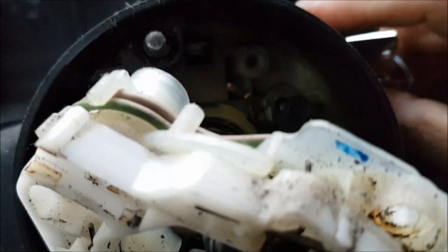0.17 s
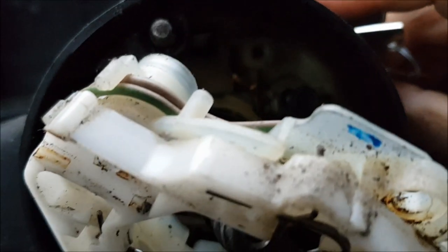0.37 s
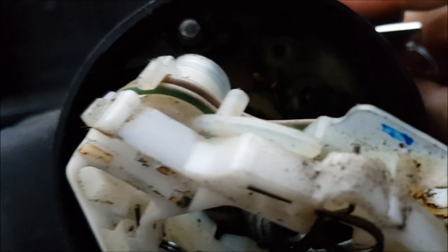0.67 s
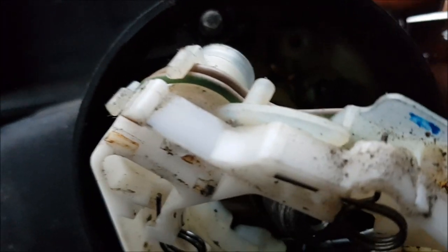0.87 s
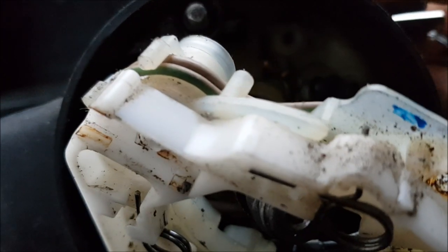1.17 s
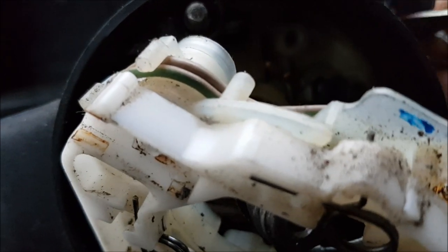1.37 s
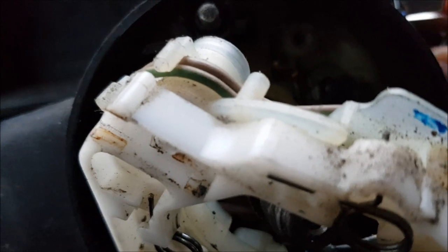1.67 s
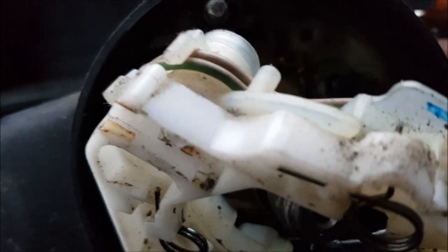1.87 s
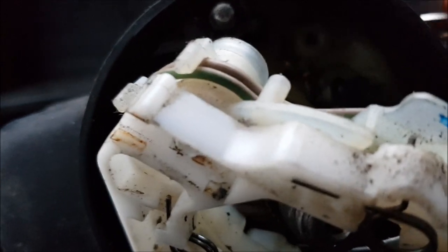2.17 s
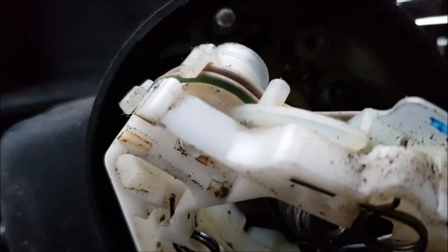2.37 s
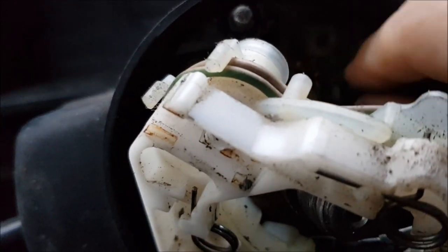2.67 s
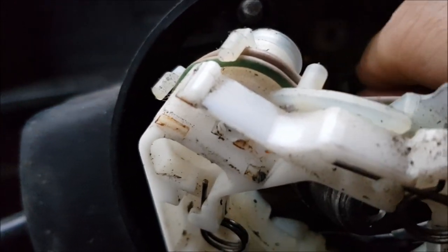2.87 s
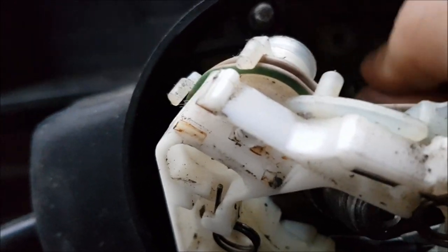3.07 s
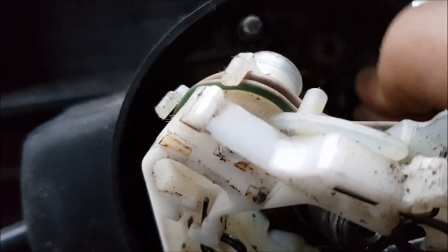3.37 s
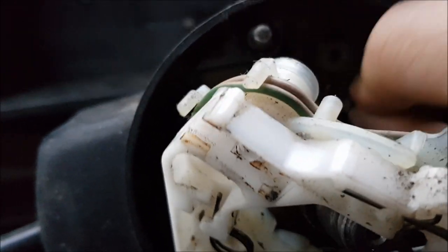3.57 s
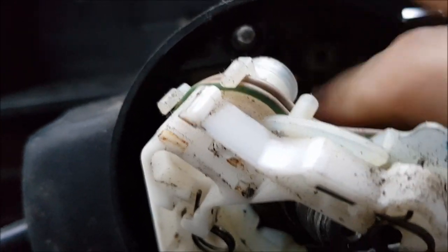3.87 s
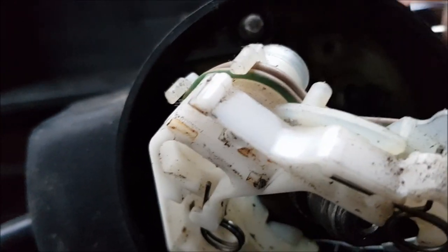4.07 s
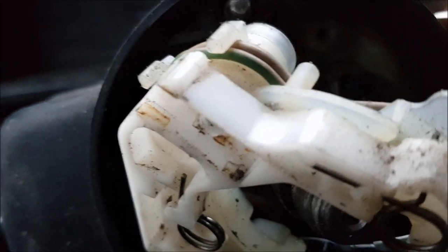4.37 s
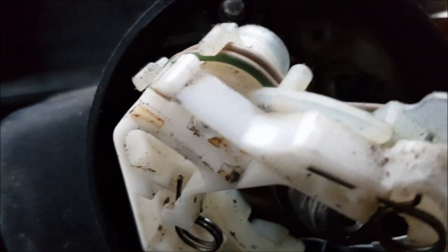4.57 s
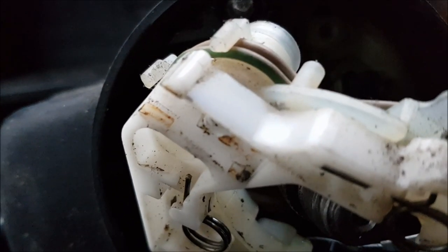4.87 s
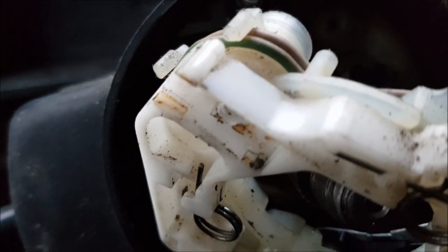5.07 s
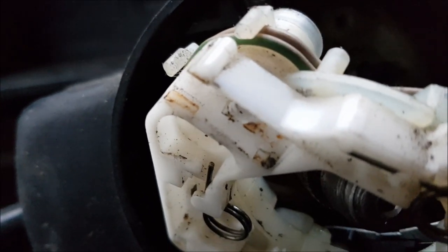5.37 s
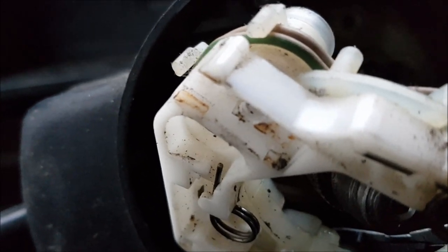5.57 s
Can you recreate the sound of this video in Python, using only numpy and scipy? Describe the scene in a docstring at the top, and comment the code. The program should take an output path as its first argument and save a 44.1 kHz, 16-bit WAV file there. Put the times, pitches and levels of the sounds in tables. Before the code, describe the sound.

Inside a parked car, a lock cylinder clicks and scrapes in the steering column while keys jingle briefly over hand rubbing and low rumble.

```python
"""Low outside rumble and a hand and sleeve rubbing on trim, close to a stereo phone in a parked car.
A lock cylinder with its keys is wiggled into the steering column: bursts of tiny contacts click in
the metal and plastic, the column shudders and thumps in its low modes, and plastic scuffs.
The cylinder slides once in its bore, the keys ring and jangle briefly, and a low hum lies underneath."""
import sys
import numpy as np
from scipy import signal
from scipy.fft import rfft, irfft, next_fast_len
from scipy.io import wavfile
from scipy.ndimage import uniform_filter1d

SR = 44100
rng = np.random.default_rng(int(sys.argv[2]) if len(sys.argv) > 2 else 0)


def log_audio(samples):
    """Write samples as a 16-bit WAV file to the path given in sys.argv[1]."""
    # one column per channel
    frames = np.atleast_2d(samples).T
    # limit to full scale, then quantise
    limited = np.clip(frames, -1, 1)
    pcm = np.round(limited * 32767).astype(np.int16)
    wavfile.write(sys.argv[1], SR, pcm)


N = 251811


def undb(db):
    return 10 ** (np.asarray(db) / 20)


def pan(db):
    """Stereo gains for a left-minus-right difference."""
    return undb(np.array([[db], [-db]]) / 2)


def over_frequency(table, hz):
    """Interpolate (Hz, value) rows on a log axis."""
    f, values = np.transpose(table)
    return np.interp(np.log(hz + 1), np.log(f + 1), values)


def over_time(table):
    """Interpolate each column of (s, value, ..) rows per sample."""
    times_s, *columns = np.transpose(table)
    return [np.interp(np.arange(N) / SR, times_s, column) for column in columns]


def resonance(f, hz, width_hz):
    """Complex response of a damped mode, gain 1 at its centre."""
    return 1j * f * width_hz / (hz ** 2 - f ** 2 + 1j * f * width_hz)


def flicker(rate_hz):
    """Random steps smoothed twice; spread near 1."""
    hold = int(SR / rate_hz)
    steps = np.repeat(rng.standard_normal(N // hold + 1), hold)
    return 1.5 * uniform_filter1d(uniform_filter1d(steps, hold), hold)[:N]


def add(out, start_s, sound):
    i = int(start_s * SR)
    out[:, i:i + sound.shape[1]] += sound[:, :N - i]


# Diffuse sound at the phone's ports. Each row: frequency in Hz, left-right correlation (floored at 0).
PORT_CORRELATION = [(60, 1), (130, 0.96), (290, 0.89), (640, 0.59), (1410, -0.089), (3100, -0.22),
                    (6820, 0.81), (15000, -0.45)]
# Port balance. Each row: frequency in Hz, left minus right in dB.
PORT_BALANCE = [(60, 5), (110, 1), (200, 4), (380, -1), (700, 1.5), (1290, 3.5), (2380, 6), (4400, 7.5),
                (8120, 2.5), (15000, -2.5)]


def diffuse_noise(spectrum):
    """Stereo noise, alike in the bass and mostly louder on the left; its mono mix has rms 1."""
    size = next_fast_len(N)
    f = np.fft.rfftfreq(size, 1 / SR)
    mid, side = rfft(rng.standard_normal((2, size)))
    correlation = np.clip(over_frequency(PORT_CORRELATION, f), 0, 1)
    sign = np.array([[1], [-1]])
    pair = np.sqrt(1 + correlation) * mid + sign * np.sqrt(1 - correlation) * side
    balance = undb(sign * over_frequency(PORT_BALANCE, f) / 2)
    noise = irfft(pair * balance * spectrum(f), size)[:, :N]
    return noise / np.sqrt(np.mean(noise.mean(0) ** 2))


# Steering column modes. Each row: frequency in Hz, level in dB, t60 after a thump in seconds.
COLUMN_MODES = [(84.1, -1.5, 0.14), (149.7, -6, 0.058), (248.5, -23.5, 0.14), (399.6, -25, 0.11)]
# Rumble through the car body. Each row: frequency in Hz, relative density in dB.
RUMBLE_SPECTRUM = [(15, -39), (35, -26), (55, -25), (110, -6), (200, -6.5), (330, -6.5), (500, -7),
                   (700, -15.5), (1200, -17), (1600, -30), (3200, -45.5), (5400, -59), (9000, -49.5),
                   (16000, -78)]
# Low noise levels. Each row: time in seconds, shudder in dB, rumble in dB.
LOW_LEVELS = [(0.0, -51, -52.5), (0.38, -52.5, -51.5), (0.76, -54, -54), (1.02, -53, -55),
              (1.37, -63, -53.5), (1.78, -52.5, -55), (2.35, -60, -48.5), (2.54, -50, -48),
              (3.37, -52, -49), (4.33, -49.5, -48.5), (4.72, -52, -51.5), (4.83, -49.5, -53),
              (5.02, -48, -51), (5.71, -46, -48.5)]


def shudder_and_rumble(width_hz=22.8):
    """The column trembles in its modes under the hand; outside rumble comes through the body."""
    shudder_db, rumble_db = over_time(LOW_LEVELS)
    shudder = diffuse_noise(
        lambda f: sum(undb(db) * resonance(f, hz, width_hz) ** 2 for hz, db, _ in COLUMN_MODES))
    rumble = diffuse_noise(lambda f: undb(over_frequency(RUMBLE_SPECTRUM, f)))
    rumble_db += 1.2 * flicker(16)
    shudder_db += 3.5 * flicker(11)
    return undb(shudder_db) * shudder + undb(rumble_db) * rumble


# Hum levels. Each row: time in seconds, fundamental in dB rms, octave in dB rms.
HUM_LEVELS = [(0, -65, -62), (2, -68.5, -60), (3.3, -54, -63.5), (5.71, -67.5, -52.5)]


def hum(hz=30):
    """A low tone and its octave drift in level."""
    phase = 2 * np.pi * hz * np.arange(N) / SR
    return sum(np.sqrt(2) * undb(db) * np.sin(k * phase)
               for k, db in enumerate(over_time(HUM_LEVELS), start=1))


# Hand and sleeve on trim. Each row: time in seconds, fine hiss in dB, dull body in dB.
RUB_LEVELS = [(0.0, -60.5, -60.5), (0.19, -60.5, -56), (0.33, -64.5, -57.5), (0.57, -68, -57.5),
              (1.03, -63.5, -58.5), (1.22, -67.5, -60.5), (2.04, -69.5, -59.5), (2.3, -63, -56),
              (2.51, -53.5, -52.5), (2.72, -50, -50), (2.91, -59, -53.5), (3.93, -62, -54.5),
              (4.15, -53.5, -54), (4.34, -63.5, -54.5), (4.77, -68.5, -60), (4.99, -69, -58.5),
              (5.31, -64, -53.5), (5.44, -66, -55.5), (5.57, -69, -58), (5.71, -65, -55)]
# Friction spectrum. Each row: frequency in Hz, relative density in dB.
RUB_SPECTRUM = [(410, -84), (700, 2.5), (1180, -4), (1330, 0), (2190, -3), (2430, -3), (3320, -7),
                (4430, -4), (9860, -8), (16000, -9.5)]


def rubbing(split_hz=5000):
    """Skin and cloth drag unevenly: a dull body and a fine hiss flicker together."""
    hiss_db, body_db = over_time(RUB_LEVELS)
    body = diffuse_noise(lambda f: undb(over_frequency(RUB_SPECTRUM, f)) / (1 + (f / split_hz) ** 4))
    hiss = diffuse_noise(
        lambda f: undb(over_frequency(RUB_SPECTRUM, f)) / (1 + (split_hz / (f + 1)) ** 4))
    drag_db = 1.7 * flicker(30)
    return undb(body_db + drag_db) * body + undb(hiss_db + drag_db) * hiss


# Resonances of trim, housing, shroud, latch, barrel and metal edge.
# Each row: centre in Hz (each click sets the latch's own), width in Hz, gain in dB.
LOCK_PARTS = [(750, 1600, -9), (1386, 575, 4), (2230, 890, 2.5), (4000, 1950, 4), (7330, 3200, 0.5),
              (11400, 6400, 4.5)]
# Lock clicks. Each row: start in seconds, level in dB, relative dB of housing, shroud, latch, barrel
# and edge, latch in Hz as the grip bends it, treble left minus right in dB, t60 at 4 kHz in seconds.
LOCK_CLICKS = [(0.058, -39.5, -30.5, -37, -8, -27, -12.5, 4450, 16.4, 0.017),
               (0.257, -1.5, -27, -26.5, -15.5, -10.5, -12.5, 3940, 7.2, 0.013),
               (0.654, -41.5, -8, -14, -21, -20, -18, 4310, 6.5, 0.018),
               (0.852, -8.5, -28.5, -30, -19, -12.5, -13.5, 4870, 9.9, 0.031),
               (1.194, -28, -16.5, -30, -9, -20, -18, 3980, 6.3, 0.015),
               (1.662, -26, -14.5, -18.5, -11, -17, -28, 4100, 7.0, 0.021),
               (1.675, -33, -5, -8.5, -21, -19, -25, 4130, 8.1, 0.012),
               (1.756, -30, -21, -18, -19, -11, -28, 3630, 8.6, 0.029),
               (1.907, -13, -16.5, -16, -12, -14, -15, 4700, 7.2, 0.012),
               (1.932, -22.5, -7, -15, -12, -19, -23, 4470, 6.0, 0.012),
               (2.019, -38.5, -14, -21.5, -15, -12, -22, 3400, 3.5, 0.018),
               (2.32, -32.5, -17, -18, -9, -21, -24, 4020, 8.8, 0.015),
               (2.386, -35, -18, -19, -12.5, -16, -13, 4030, 3.5, 0.015),
               (2.665, -36, -10.5, -19, -24, -19, -16, 4950, 9.6, 0.018),
               (2.781, -31, -28, -13, -12, -18, -11, 3840, 3.0, 0.013),
               (3.08, -22.5, -10.5, -18, -17, -23, -29, 4000, 10.7, 0.015),
               (3.136, -38, -20, -15, -13, -10, -18, 4100, 5.0, 0.016),
               (3.209, -34, -20, -12, -15, -18, -16, 3930, 6.7, 0.016),
               (3.384, -37, -9, -16, -20, -22, -26, 3440, 6.8, 0.017),
               (3.943, -20.5, -15.5, -14.5, -12, -11.5, -43, 4230, 11.8, 0.021),
               (3.964, -29.5, -14, -11, -12, -11, -13, 4320, 5.5, 0.012),
               (4.034, -25, -34, -6.5, -10, -14, -22, 4860, 7.5, 0.0065),
               (4.205, -7.5, -18.5, -26, -17, -14, -12.5, 3940, 2.8, 0.013),
               (4.247, -15.5, -8.5, -31, -12.5, -7, -3.5, 3640, 3.8, 0.0069),
               (4.251, -14, -17, -36, -18, -17, -16, 4040, 4.5, 0.019),
               (4.279, -20.5, -20, -27, -14.5, -10, -13, 3880, 3.6, 0.02),
               (4.545, -6.5, -14, -11, -13.5, -17.5, -24, 4000, 7.4, 0.03),
               (4.585, -38.5, -20, -4, -17, -7, -19, 4470, 4.0, 0.014),
               (4.965, -36.5, -9, -16, -9, -18, -36.5, 3740, 7.9, 0.025),
               (5.091, -29, -12.5, -11.5, -18, -16, -33, 5000, 8, 0.022),
               (5.246, -14, -20.5, -20.5, -14, -15, -16.5, 5140, 8.7, 0.031),
               (5.32, -32.5, -10, -9, -8, -25, -29, 3170, 10, 0.017),
               (5.353, -27, -11.5, -17, -14, -16, -31, 3660, 12.6, 0.012),
               (5.362, -30, -9, -9.5, -19, -22, -37, 4120, 6.4, 0.027),
               (5.422, -41.5, -8, -13, -16, -20, -29, 4800, 5.0, 0.018),
               (5.477, -24.5, -9, -24, -15.5, -25, -38, 4040, 11.3, 0.023),
               (5.486, -21.5, -9.5, -14.5, -19, -25, -39, 4220, 9.8, 0.014),
               (5.517, -33, -12, -4.5, -23, -31, -38, 3700, 6.5, 0.015),
               (5.573, -41.5, -5, -8, -22, -13, -30, 4830, 3.5, 0.016),
               (5.606, -43.5, -1, -17, -26, -22, -33, 4090, 4.0, 0.033)]


def stray_ticks(per_s=3, floor_db=-50, mean_excess_db=3):
    """Faint copies of the median click at random times, as rows."""
    typical = np.median(LOCK_CLICKS, axis=0)[2:]
    return [(when * N / SR, floor_db - mean_excess_db * np.log(1 - strength), *typical)
            for when, strength in rng.uniform(0, 1, (int(per_s * N / SR), 2))]


def clicks(out, correlation=0.17, left_lag_s=0.00014, rise_s=0.00063, shade_hz=700,
           cabin_db=-12, cabin_t60_s=0.066):
    """Bursts of tiny contacts ring the parts of the lock; the cabin adds a short tail."""
    size = 4096
    t, f = np.arange(size) / SR, np.fft.rfftfreq(size, 1 / SR)
    rise = 1 - np.exp(-t / rise_s)
    cabin_decay = rise * undb(cabin_db - 60 * t / cabin_t60_s)
    # the phone's body shades the far port in the treble
    shade = f ** 2 / (f ** 2 + shade_hz ** 2) * np.array([[0.5], [-0.5]])
    delay = np.array([np.exp(-2j * np.pi * f * left_lag_s), np.ones(len(f))])
    for start_s, level_db, *struck_db, latch_hz, pan_db, t60_s in list(LOCK_CLICKS) + stray_ticks():
        left, other = rng.standard_normal((2, size))
        contacts = np.array([left, correlation * left + np.sqrt(1 - correlation ** 2) * other])
        tail = cabin_decay * rng.standard_normal((2, size))
        trim_db = np.mean(struck_db[:2])
        ring = 0
        for k, drive_db in enumerate([trim_db, *struck_db]):
            hz, width_hz, gain_db = LOCK_PARTS[k]
            hz = latch_hz if k == 3 else hz
            # small stiff parts stop chattering first
            chatter = rise ** 2 * undb(-60 * t / t60_s * (hz / 4000) ** 0.32)
            gain = (-1) ** k * undb(gain_db + drive_db) * np.sqrt(SR / width_hz)
            ring += gain * resonance(f, hz, width_hz) ** 2 * rfft(chatter * contacts + tail)
        add(out, start_s, undb(level_db) * irfft(ring * delay * undb(pan_db * shade), size))


# Pushes on the column. Each row: start in seconds, level in dB, upper-mode boost in dB.
COLUMN_PUSHES = [(.263, -29.5, 1), (0.817, -21, 3.5), (1.915, -26, 6.5), (2.54, -29, 10), (2.685, -32, 0),
                 (3.08, -22, 8.5), (4.552, -9.5, 1.5), (4.619, -21, 1), (4.732, -34.5, -9),
                 (5.087, -32, -1), (5.595, -33, 2)]


def thumps(out, rise_s=0.01, pan_db=2.5):
    """A soft push sets the column swinging in its low modes."""
    t = np.arange(int(0.3 * SR)) / SR
    rise = 1 - np.exp(-t / rise_s)
    for start_s, level_db, upper_db in COLUMN_PUSHES:
        swing = sum(undb(db + (k > 0) * upper_db - 60 * t / t60_s) * np.sin(2 * np.pi * hz * t)
                    for k, (hz, db, t60_s) in enumerate(COLUMN_MODES))
        add(out, start_s, undb(level_db) * pan(pan_db) * swing * rise)


# Scuffs and key clatter. Each row: start in seconds, length in seconds, rms level in dB, centre in Hz.
NOISE_BURSTS = [(0.479, 0.06, -63.5, 4000), (.806, 0.045, -45.5, 2250), (2.551, 0.056, -42, 7900),
                (2.717, 0.073, -49, 9000), (2.907, 0.078, -55, 5940), (3.45, 0.07, -57.5, 6000),
                (3.536, 0.07, -53, 7900), (3.569, 0.17, -51.5, 1780), (3.63, 0.05, -51, 5500),
                (3.82, 0.038, -70, 3950), (4.016, 0.046, -46, 7900), (4.195, .019, -40, 7000),
                (4.212, .034, -36.5, 9000), (4.323, 0.017, -46.5, 4000), (4.966, .017, -54, 2970),
                (5.219, 0.027, -44, 1790), (5.304, 0.023, -48, 2500)]


def scuffs_and_clatter(out, grain_db=4, grain_samples=64, pan_db=5):
    """Short grainy noise bursts: scuffs on plastic, and the bright clatter of jangling keys at 4.21 s."""
    for start_s, length_s, level_db, hz in NOISE_BURSTS:
        n = int(length_s * SR)
        grains = undb(grain_db * np.repeat(rng.standard_normal(n // grain_samples + 1), grain_samples))
        noise = rng.standard_normal((2, n)) * grains[:n] * np.hanning(n) ** 0.5
        band = resonance(np.fft.rfftfreq(n, 1 / SR), hz, width_hz=2 * hz) ** 2
        burst = irfft(rfft(noise) * band, n)
        add(out, start_s, undb(level_db) * pan(pan_db) * burst / np.sqrt(np.mean(burst ** 2)))


# Bore resonances. Each row: centre in Hz, width in Hz, gain in dB.
BORE_BANDS = [(1850, 350, 7), (4800, 1100, 2.5), (6450, 800, -6), (10400, 3700, -4.5)]


def cylinder_slide(start_s=0.9, level_db=-57, rise_s=0.036, hold_s=0.11, t60_s=0.2):
    """The cylinder slides once; the bore colours its friction noise."""
    friction = diffuse_noise(
        lambda f: sum(undb(db) * abs(resonance(f, hz, width)) ** 2 for hz, width, db in BORE_BANDS))
    t = np.arange(N) / SR - start_s
    rise = np.clip(t / rise_s, 0, 1)
    fade = undb(-60 * np.maximum(t - rise_s - hold_s, 0) / t60_s)
    return undb(level_db) * rise * fade * friction


# Key modes. Each row: frequency in Hz, free t60 in seconds, dB in the small key, dB in the large key.
KEY_RING_MODES = [(2240, 0.61, -14.5, -12), (6400, 0.055, -5, -28), (6990, 0.11, 1, -34),
                  (7530, 0.21, -8, -12), (9550, 0.36, -34, -1.5), (12100, 0.029, -15, -10),
                  (12720, 0.053, -3.5, 6.5)]
# Keys touching. Each row: start in seconds, small key in dB, large key in dB, grip t60 in seconds.
KEY_TOUCHES = [(1.663, -45.5, -64, 0.18), (1.7564, -30.5, -45, 0.06), (1.7624, -42, -61, 0.17),
               (1.7956, -51, -68, 0.062), (2.0203, -56, -58, 0.24), (2.3201, -63, -51, 0.56),
               (2.7816, -44, -39.5, .48), (3.212, -54, -47.5, .22), (4.2058, -16, -27.5, 0.46),
               (4.2174, -32, -23.5, .3), (4.25, -36, -15, 0.027)]


def keys(out, flutter_db=3.0, rise_s=0.002, stop_t60_s=0.026, pan_db=3):
    """Two keys ring in thin modes, fluttering as they turn, until the next lock click stills them."""
    t = np.arange(int(0.3 * SR)) / SR
    rise = 1 - np.exp(-t / rise_s)
    for start_s, small_db, large_db, grip_t60_s in KEY_TOUCHES:
        free_s = min(click_s - start_s for click_s, *_ in LOCK_CLICKS if click_s > start_s + 0.015)
        damping = undb(-60 * t / grip_t60_s - 60 * np.maximum(t - free_s, 0) / stop_t60_s)
        ring = 0
        for hz, t60_s, in_small_db, in_large_db in KEY_RING_MODES:
            speed, flutter_phase, phase, spread = rng.uniform(0, 1, 4)
            gain = undb(small_db + in_small_db) + undb(large_db + in_large_db)
            flutter_hz = 60 + 120 * speed
            flutter = min(hz / 7000, 1) * np.sin(2 * np.pi * (flutter_hz * t + flutter_phase))
            port_cycles = np.array([[0], [0.15 + 0.089 * spread]])
            tone = np.sin(2 * np.pi * (hz * t + phase + port_cycles))
            ring += gain * undb(-60 * t / t60_s + flutter_db * flutter) * tone
        add(out, start_s, pan(pan_db) * ring * rise * damping)


def scene():
    out = shudder_and_rumble() + hum() + rubbing() + cylinder_slide()
    for add_source in (clicks, thumps, scuffs_and_clatter, keys):
        add_source(out)
    return out


def record(dry, cutoff_hz=16000):
    """The phone cuts the top treble."""
    return signal.sosfilt(signal.ellip(12, 0.2, 95, cutoff_hz, fs=SR, output="sos"), dry)


dry = scene()
out = record(dry)
log_audio(out)
```